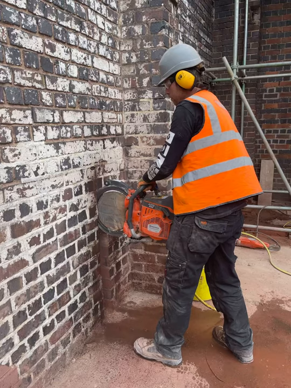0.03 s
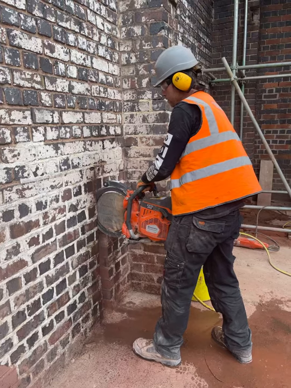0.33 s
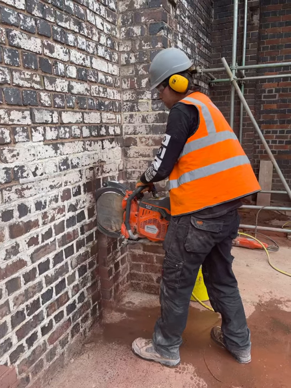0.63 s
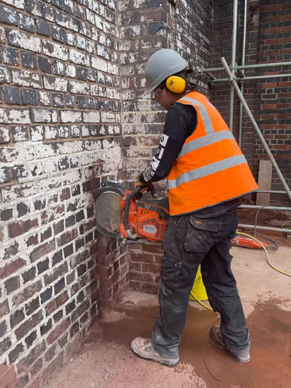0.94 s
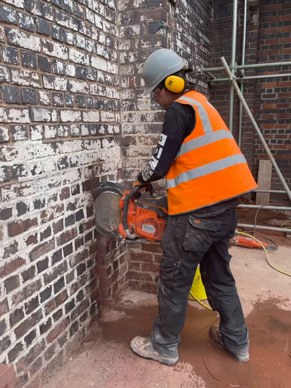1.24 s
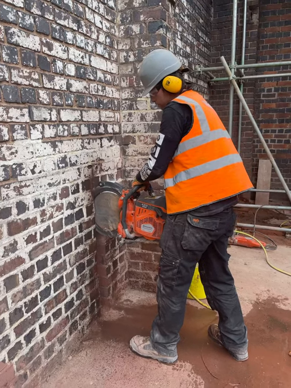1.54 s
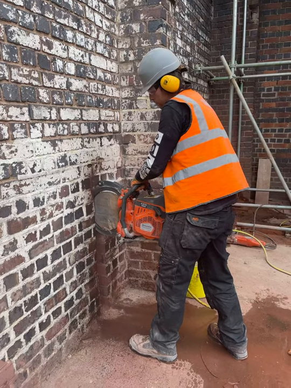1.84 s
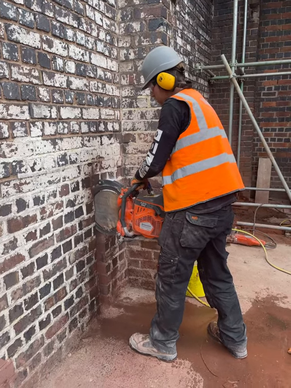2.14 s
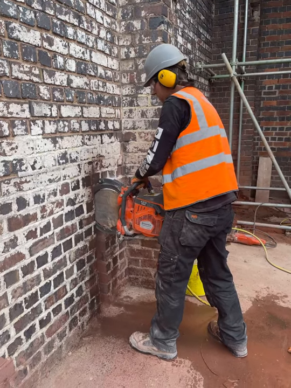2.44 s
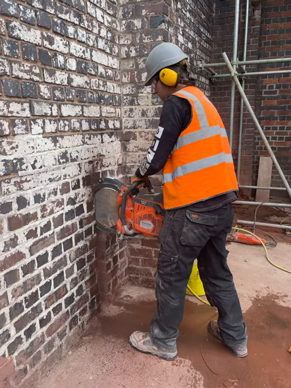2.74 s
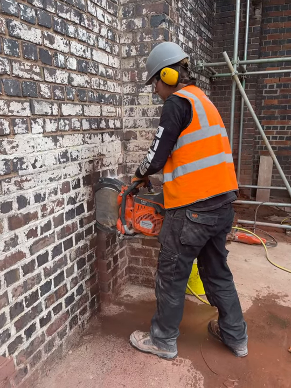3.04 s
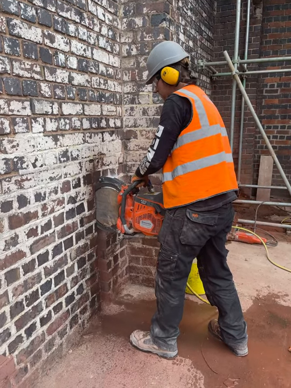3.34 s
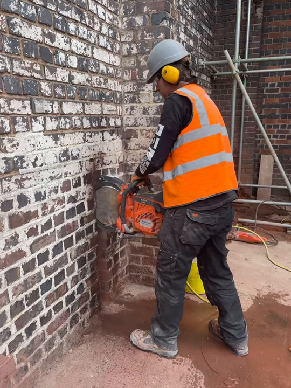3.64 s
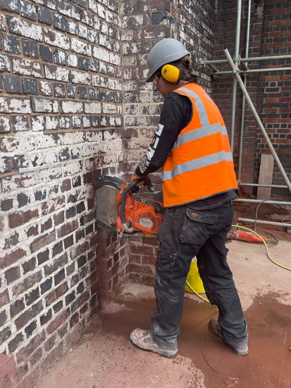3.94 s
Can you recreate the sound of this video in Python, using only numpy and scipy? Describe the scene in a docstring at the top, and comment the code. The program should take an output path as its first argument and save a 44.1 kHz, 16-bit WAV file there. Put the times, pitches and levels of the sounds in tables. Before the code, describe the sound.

A two-stroke masonry saw cuts brick at full throttle throughout, with gritty hiss, ringing steel and a droning, rattling engine. At about 0.8 seconds the blade binds with a brief squeal and the engine labours. It runs lighter, bites gently near 2.4 seconds, then stays under heavy load from 3.1 seconds until the end at 4. It is heard a few metres away, with short echoes off brick walls.

```python
"""A two-stroke ring saw cutting brick in a walled corner, one microphone a few metres away.
From the start it is at full throttle: diamond teeth grind with a gritty hiss and ring the steel, the
piston drones on every turn, and the exhaust rattles as the governor fires only every second to fourth.
At 0.8 s the blade bites and binds with a brief squeal; the speed sags and more turns fire.
It runs lighter, bites less hard near 2.4 s, then stays under heavy load from 3.1 s to the end."""
import sys
import numpy as np
from scipy import signal
from scipy.fft import rfft, irfft
from scipy.io import wavfile
from scipy.ndimage import uniform_filter1d

SR = 44100
rng = np.random.default_rng(int(sys.argv[2]) if len(sys.argv) > 2 else 0)


def unload_wav(signal):
    """Save mono or channel-first audio to the path in sys.argv[1] as 16-bit WAV at rate SR, clipped to [-1, 1]."""
    wavfile.write(
        sys.argv[1],
        SR,
        np.round(np.clip(np.atleast_2d(signal).T, -1, 1) * 32767).astype(np.int16),
    )


N = 176400
TIME = np.arange(N) / SR


def grinding():
    """Fine hiss and breaking grains of brick flutter with the contact and ring the blade."""
    # colour of the hiss (frequency [Hz], relative level [dB])
    hiss_colour = [(250, -21), (500, -1.5), (1000, -1.5), (1700, 3), (2500, -1), (3100, -1), (4400, -1.5),
                   (6500, -2), (9000, -2), (10900, -4.5), (11700, -8.5), (14000, -12.5), (15700, -13)]
    # strength of the hiss (time [s], level before the lift [dB])
    hiss_level = [(0.06, -21.5), (1.55, -22), (3.63, -21.5), (4.0, -22)]
    # modes of the steel ring (frequency [Hz], width [Hz], level at first [dB], deep in the cut [dB])
    ring_modes = [(3050, 36, -29, -51), (3144, 15, -43.5, -55), (3160, 22, -57, -35), (3420, 54, -59, -45),
                  (3720, 8.8, -39, -54.5), (3900, 19, -53, -39), (5130, 160, -46.5, -33),
                  (6500, 24, -50, -40.5), (7544, 50, -56, -31), (8190, 220, -43, -33.5),
                  (9460, 56, -39, -40), (9625, 37, -60, -36), (10570, 140, -36, -43),
                  (14800, 150, -40, -46)]
    grains_per_s, grit_share, lift_db = 2500, 0.37, 1.5
    grains = rng.random(N) < grains_per_s / SR
    grain_db = np.minimum(rng.exponential(1, N), 5)
    grit = unit(grains * amp(grain_db) * rng.choice([-1, 1], N))
    scrape = np.sqrt(1 - grit_share) * rng.standard_normal(N) + np.sqrt(grit_share) * grit
    # the hiss flickers faintly, in patches of frequency and time
    spectrum = signal.stft(scrape, nperseg=512)[2]
    patches = uniform_filter1d(rng.standard_normal(spectrum.shape), size=4, axis=0)
    patches = unit(uniform_filter1d(patches, size=12, axis=1))
    scrape = unit(signal.istft(spectrum * amp(0.5 * patches), nperseg=512)[1][:N])
    hiss = amp(lift_db + curve(hiss_level)) * colour(scrape, hiss_colour)
    flutter = amp(0.65 * drift(hz=46.5))
    depth = TIME / TIME[-1]
    steel = sum(amp(first + (deep - first) * depth + 1.2 * drift(hz=1)) * rubbed_mode(hz, width)
                for hz, width, first, deep in ring_modes)
    return flutter * (hiss + steel)


def singing(load):
    """Rubbed in the slot, the blade sings on its low modes, louder as it bites."""
    # low blade modes (frequency [Hz], width [Hz], level running light [dB], under load [dB])
    low_modes = [(1722, 19.6, -33.5, -31), (1769, 18.5, -36, -31.5), (2211, 21, -38, -31.5)]
    return sum(amp(light + (loaded - light) * load) * rubbed_mode(hz, width)
               for hz, width, light, loaded in low_modes)


def squeal():
    """The blade briefly binds in the slot: one mode swells and fades."""
    peak_s, swell_s, peak_db = 0.801, 0.16, -34
    swell = np.exp(-((TIME - peak_s) / swell_s) ** 2)
    return amp(peak_db) * swell * resonate(rng.standard_normal(N), hz=3410, width=9.2)


def drone(turns, load):
    """Piston and intake pulse on every turn: harmonics of the crank whose balance shifts with load."""
    # engine harmonics (multiple of the speed, level running light [dB], under load [dB])
    harmonics = [(1, -30.5, -27.5), (2, -54.5, -37), (3, -41.5, -36.5), (4, -30, -32.5), (6, -33, -32),
                 (7, -46.5, -44), (9, -48.5, -44), (10, -50, -41), (11, -45, -25), (14, -56, -40),
                 (15, -40, -46), (20, -43, -42.5), (22, -40.5, -37)]
    waver_db, intake_lag_turns = 0.6, 0.4203  # the intake gulp follows the exhaust
    phase = 2 * np.pi * (turns - intake_lag_turns)
    return np.sqrt(2) * sum(
        amp(light + (loaded - light) * load + waver_db * drift(hz=3.4)) * np.cos(multiple * phase)
        for multiple, light, loaded in harmonics)


def exhaust(turns, load):
    """Turns that the governor lets fire send a bang and a puff of gas through the silencer."""
    # governor, settling on one turn in three at middling load (load [0-1], turns that fire [0-1])
    firing_share = [(0, .25), (.18, .325), (.55, .338), (1, .46)]
    # colour of the exhaust (frequency [Hz], relative level [dB])
    gas_colour = [(30, -64), (48, -15), (70, -16), (105, -6.5), (150, -6.5), (205, -1.5), (265, -1.5),
                  (330, -13), (430, 0), (560, 5), (780, -5), (1000, 4), (1180, -3), (1400, 4.5), (1700, 7),
                  (1950, -2), (2300, -0.5), (2600, -9), (4500, -15.5), (12000, -50)]
    # silencer resonances (frequency [Hz], width [Hz], level before the swell [dB])
    silencer_modes = [(1739, 42, -30.5), (2120, 25, -37.5)]
    # slow swell of the whole exhaust (time [s], gain [dB])
    swell = [(.1, -1), (.8, -0.5), (1.3, -1), (2.15, 1.35), (2.75, 0.4), (3.2, -0.5), (3.9, .5)]
    governor_scatter, load_db, spread_db = 0.054, -5, 0.85
    port_opening_s, puff_decay_s = 0.00082, 0.0015
    tops = np.flatnonzero(np.diff(np.floor(turns)) > 0)  # one sample on each turn
    luck, size = rng.standard_normal((len(tops), 2)).T
    # a turn fires when the running sum of shares passes a whole number
    due = np.cumsum(np.interp(load[tops], *np.transpose(firing_share))) + governor_scatter * luck
    fires = np.diff(np.floor(np.maximum.accumulate(due)), prepend=0) > 0
    bangs = np.zeros(N)
    bangs[tops] = fires * amp(load_db * load[tops] + spread_db * size)
    t = TIME[:SR // 20]
    puff_shape = (1 - np.exp(-t / port_opening_s)) * np.exp(-t / puff_decay_s)
    puffs = signal.oaconvolve(bangs, puff_shape)[:N] * rng.standard_normal(N)
    gas = colour(unit(bangs) + 0.25 * unit(puffs), gas_colour)
    silencer = sum(amp(db) * resonate(gas, hz, width) for hz, width, db in silencer_modes)
    return amp(curve(swell)) * (amp(-27) * gas + silencer)


def shudder(load):
    """Low shaking of the machine body, stronger as the blade bites."""
    # colour of the shaking (frequency [Hz], relative level [dB])
    body_colour = [(20, -50), (33, -35), (48, -5), (75, 2), (110, 3.5), (200, 0.5), (330, -1), (600, -22)]
    return amp(-47 + 5 * load) * colour(rng.standard_normal(N), body_colour)


def corner(x):
    """The microphone hears the direct sound, a few close echoes and a short tail off the brick."""
    # echoes off ground and walls (delay [s], gain relative to the direct sound)
    echoes = [(.0027, 0.19), (.0046, 0.15), (.0098, 0.17), (0.0156, 0.1)]
    tail_t60_s, tail_db = 0.25, -10
    t = TIME[:SR // 2]
    tail = rng.standard_normal(len(t)) * amp(-60 * t / tail_t60_s) * (t > echoes[1][0])
    taps = amp(tail_db) * tail / np.linalg.norm(tail)
    taps[0] = 1
    for delay, gain in echoes:
        taps[round(delay * SR)] += gain
    return signal.fftconvolve(x, taps / np.linalg.norm(taps))[:N]


def amp(db):
    """Decibels to gain."""
    return 10 ** (np.asarray(db) / 20)


def unit(x):
    """Scales to rms 1."""
    return x / np.sqrt(np.mean(x ** 2) + 1e-20)


def curve(points):
    """A control curve at every sample."""
    return np.interp(TIME, *np.transpose(points))


def drift(hz):
    """Smooth random wander of rms 1, up to about this rate."""
    f = np.fft.rfftfreq(N, 1 / SR)
    return unit(irfft(rfft(rng.standard_normal(N)) * (f > 0) / (1 + (f / hz) ** 4), N))


def colour(x, points, size=4096):
    """Minimum-phase filter with the given spectrum; output at rms 1."""
    hz, db = np.transpose(points)
    bins_hz = abs(np.fft.fftfreq(size, 1 / SR))
    log_gain = np.log(amp(np.interp(np.log(bins_hz + 1), np.log(hz + 1), db)))
    taps = np.fft.ifft(np.exp(np.conj(signal.hilbert(log_gain)))).real
    return unit(signal.oaconvolve(x, taps[:size // 2])[:N])


def resonate(x, hz, width):
    """One resonance, its width in Hz; output at rms 1."""
    r = np.exp(-np.pi * width / SR)
    return unit(signal.lfilter([1, 0, -1], [1, -2 * r * np.cos(2 * np.pi * hz / SR), r * r], x))


def rubbed_mode(hz, width):
    """Friction noise rings one mode; two passes at twice the width give it steep sides."""
    return resonate(resonate(rng.standard_normal(N), hz, 2 * width), hz, 2 * width)


def scene():
    """The crank times drone and exhaust; the load drives harmonics, firing, singing and shudder."""
    # how hard the blade bites (time [s], load [0-1])
    bite = [(.05, 0.38), (.3, .3), (.58, 0.28), (.77, 1), (.96, 0.99), (1.25, .15), (1.55, .3),
            (1.72, 0.02), (2.22, 0.37), (2.38, .65), (2.6, .2), (2.98, 0.15), (3.13, .9), (3.55, 0.84),
            (3.95, 0.92)]
    # engine speed (time [s], speed [turns/s])
    crank_speed = [(0.06, 155.9), (0.33, 156.1), (0.6, 155.3), (0.8, 154.7), (0.95, 155.0), (1.05, 155.5),
                   (1.35, 156.3), (1.5, 155.3), (1.67, 156.8), (1.95, 156.2), (2.2, 156.3), (2.33, 154.7),
                   (2.57, 156.7), (2.9, 156.2), (3.15, 154.7), (3.52, 154.8), (3.73, 154.3), (3.95, 155.1)]
    jitter_hz = 0.25
    load = curve(bite)
    turns = np.cumsum(curve(crank_speed) + jitter_hz * drift(hz=31.9)) / SR
    engine = drone(turns, load) + corner(exhaust(turns, load))
    blade = grinding() + singing(load) + squeal()
    return (engine + blade + shudder(load))[None]


def record(dry):
    """The sound cuts in at once, with the highest treble steeply cut off."""
    start_s, cutoff_hz = 0.036, 15760
    lowpass = signal.firwin(1023, cutoff_hz, window=("kaiser", 9), fs=SR)
    return signal.oaconvolve(dry * (TIME > start_s), lowpass[None], "same")


dry = scene()
out = record(dry)
unload_wav(out)
```